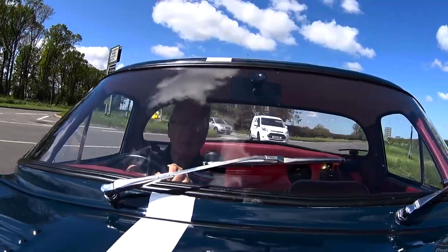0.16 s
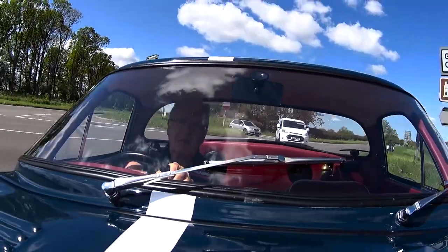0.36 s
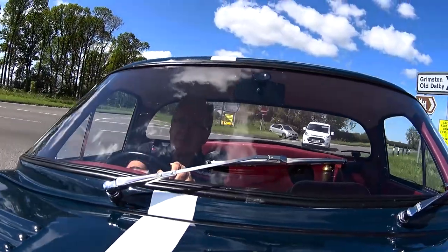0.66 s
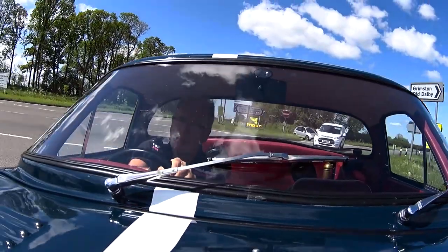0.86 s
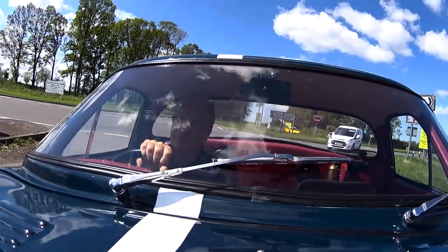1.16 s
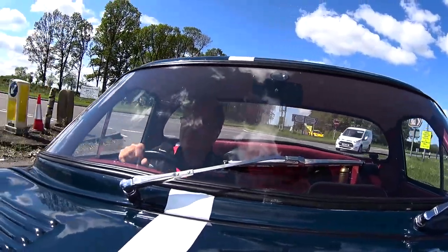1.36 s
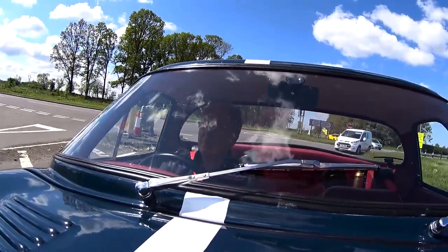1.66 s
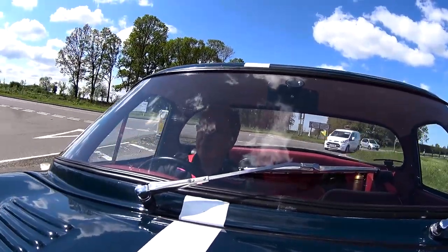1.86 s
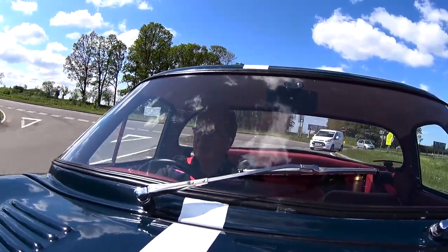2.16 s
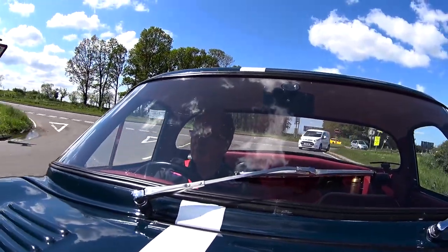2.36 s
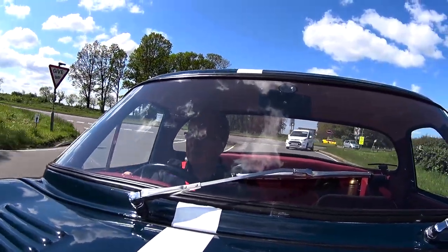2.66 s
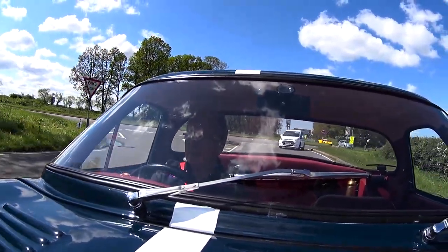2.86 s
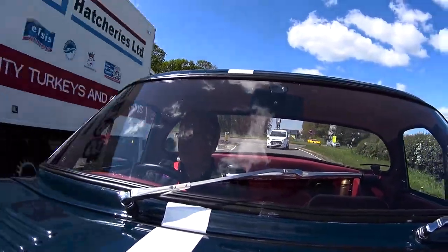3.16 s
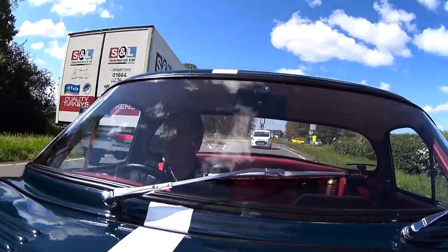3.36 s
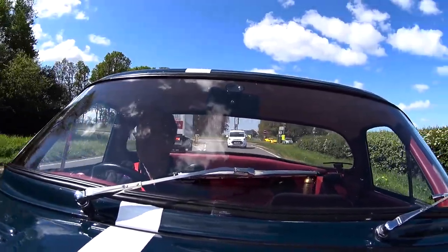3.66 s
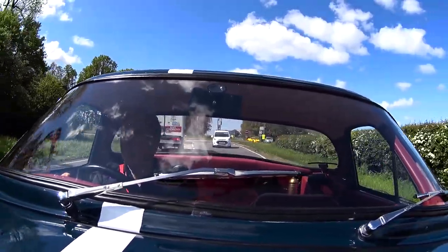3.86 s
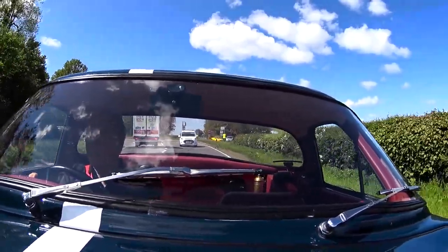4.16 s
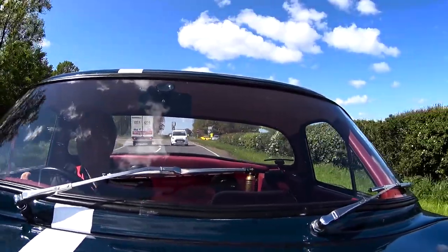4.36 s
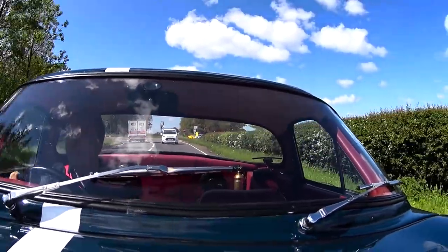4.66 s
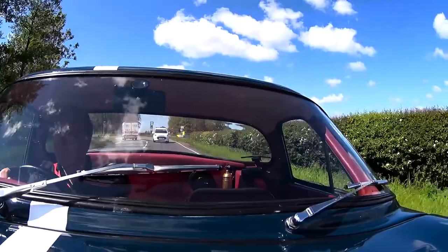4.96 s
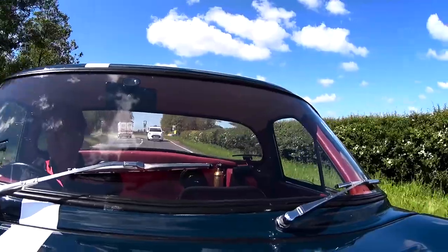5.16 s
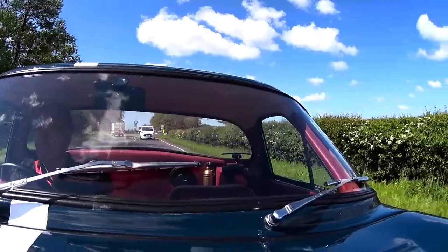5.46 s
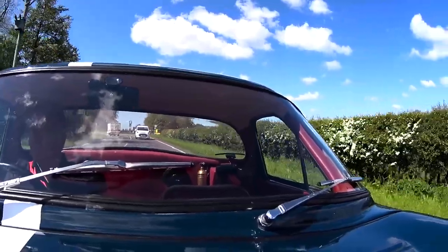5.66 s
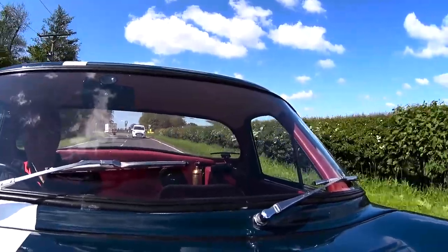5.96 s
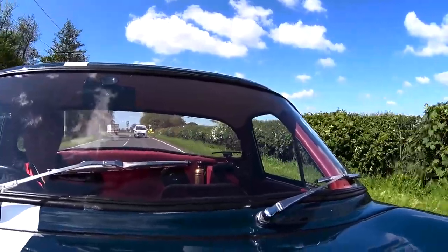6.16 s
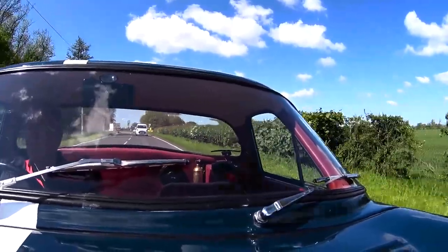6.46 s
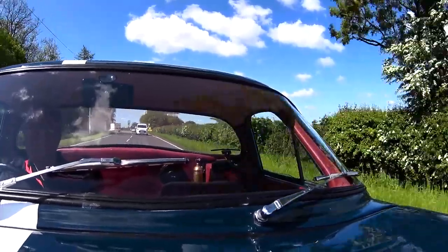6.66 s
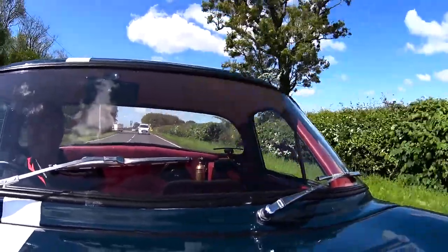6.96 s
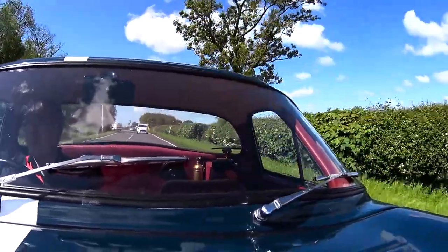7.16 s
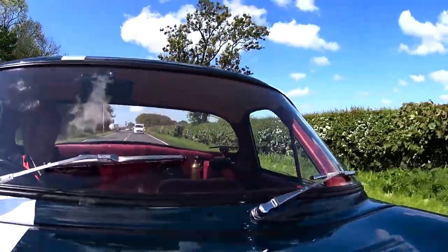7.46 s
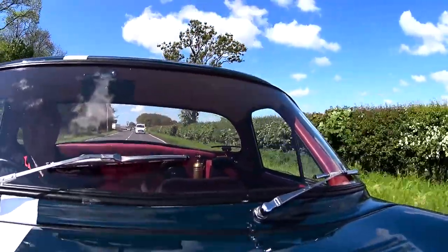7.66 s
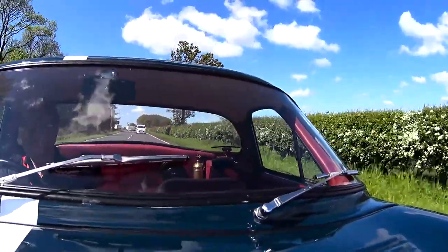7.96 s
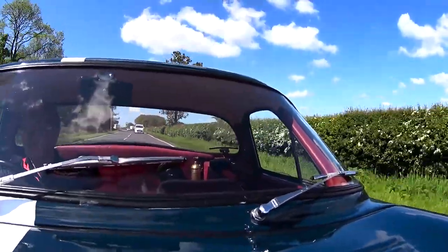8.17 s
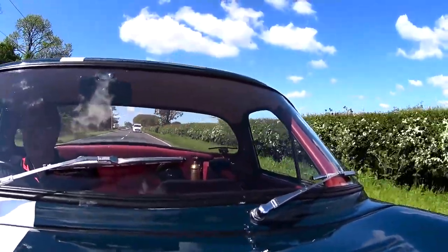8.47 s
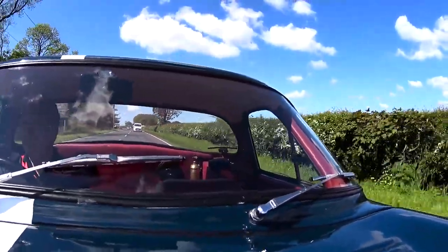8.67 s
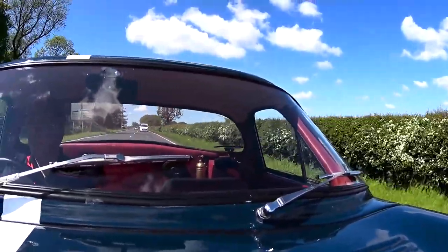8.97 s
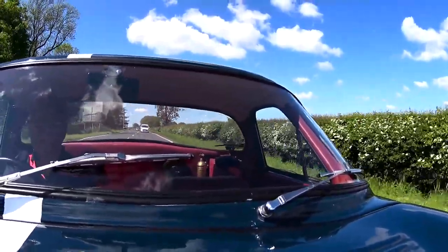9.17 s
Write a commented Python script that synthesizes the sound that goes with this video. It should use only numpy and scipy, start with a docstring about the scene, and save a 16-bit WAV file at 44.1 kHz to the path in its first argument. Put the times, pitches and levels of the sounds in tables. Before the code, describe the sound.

From a microphone on the bonnet of a moving sports car, a V8 engine coasts at low revs, then climbs in one long, booming pull, getting higher and louder. It falls away for a gear change, blips and picks up again at a lower pitch. Low wind buffeting and road rumble build throughout, with faint metallic ticks and jingles from vibrating fittings.

```python
"""V8 sports car from the bonnet

The car coasts, pulls through one gear, shifts at 7-8 s and pulls again. The engine sounds in orders
(multiples) of its two-turn cycle, coloured by pipes and panels. Air buffets the microphone, tyres
and wind grow with speed, loose parts jingle, chatter, tick and ping; a limiter holds the peaks."""
import sys
import numpy as np
from scipy import signal
from scipy.fft import rfft, irfft, next_fast_len
from scipy.io import wavfile
from scipy.ndimage import uniform_filter1d, minimum_filter1d

SR = 44100
rng = np.random.default_rng(int(sys.argv[2]) if len(sys.argv) > 2 else 0)


def wrap_up_sound(samples):
    """Save the sound to the file named by the first command line argument, as 16-bit audio."""
    columns = np.atleast_2d(samples).T
    # keep every value between -1 and 1, then stretch to whole-number steps
    tamed = np.clip(columns, -1, 1)
    steps = np.round(tamed * 32767).astype(np.int16)
    wavfile.write(sys.argv[1], SR, steps)


N = 410571
T = np.arange(N) / SR
CYLINDERS, LOW_FIRING_HZ, TOP_FIRING_HZ = 8, 140, 350
SIDE = np.array([[1], [-1]])  # left plus, right minus
# engine firing rate: t/s, f/Hz
FIRING_RATE = [(0, 146), (.9, 137), (1.4, 141.5), (2, 156.5), (2.9, 182), (3.6, 211), (4.4, 246),
               (5.2, 282.5), (6, 316), (6.85, 352.5), (7.03, 354.5), (7.3, 321), (7.8, 256.5), (7.88, 270),
               (7.93, 308), (8.04, 310), (8.11, 262), (8.16, 256), (8.26, 243), (9.3, 266)]


def undb(db):
    """Decibels to gain."""
    return np.exp(np.log(10) / 20 * np.asarray(db))


def curve(table):
    """A (t/s, value) table, linearly interpolated per sample."""
    return np.interp(T, *np.transpose(table))


def unit(x):
    """Scale to rms 1."""
    return x / np.sqrt(np.mean(x ** 2))


def walk(rate_hz):
    """Random wander with a spread near 1."""
    return 1.2 * np.interp(T * rate_hz, np.arange(8192), rng.standard_normal(8192))


def pan(left_db):
    """Channel gains for a left minus right level."""
    return undb(SIDE * left_db / 2)


def noise(colour, side_db):
    """Stereo noise with an (f/Hz, level/dB) spectrum: mid at rms 1, side at side_db."""
    hz, db = np.transpose(colour)
    size = next_fast_len(N, real=True)
    bins_hz = np.maximum(np.fft.rfftfreq(size, 1 / SR), 1)
    gain = undb(np.interp(np.log(bins_hz), np.log(hz), db, left=-120, right=-120))
    mid, side = irfft(rfft(rng.standard_normal((2, size))) * gain, size)[:, :N]
    return unit(mid) + undb(side_db) * unit(side) * SIDE


def response(hz, resonances):
    """Gain at hz of a set of resonances (f/Hz, width/Hz, level/dB)."""
    grid_hz = np.arange(10, 3000)
    power = sum(undb(db) ** 2 / (1 + ((grid_hz / f - f / grid_hz) * f / width_hz) ** 2)
                for f, width_hz, db in resonances)
    return np.interp(hz, grid_hz, np.sqrt(power))


def speed_db(cruise_db, db_per_doubling, wind_share, cruise_km_h=100):
    """Level that grows with road speed and takes a share of the headwind."""
    # road speed: t/s, v/(km/h)
    speed = [(0, 44.8), (1.3, 42), (2.9, 40.7), (5.2, 74.4), (7, 90.3), (8.2, 98), (9.3, 100)]
    # wind on the bonnet: t/s, level/dB
    headwind = [(0, -7.5), (2.9, 4.5), (3.3, 5.5), (5.3, 3), (6.85, 8), (7.9, -5.5), (8.9, 1.5), (9.3, 1.5)]
    doublings = np.log2(curve(speed) / cruise_km_h)
    return cruise_db + db_per_doubling * doublings + wind_share * curve(headwind)


def boom(angle, cycle_hz, shut, flutter_db=.5, spread_rad=.24, shift_s=7.6, tall_gear_db=-9):
    """Strong low orders swell as the revs carry them through exhaust and cabin resonances."""
    # booming orders: order, left minus right/dB
    orders = [(2, 3.3), (6, 2), (8, -.7), (16, 0)]
    # their strengths: full-throttle level/dB, change when shut/dB
    levels = [(2, -29), (-7, -11.5), (3, -15.5), (-5, -8.5)]
    # exhaust and cabin: f/Hz, width/Hz, level/dB
    resonances = [(40, 10.4, 16.5), (57.8, 4.6, 19), (149, 29.5, 8.5), (206.6, 14.8, 9.5),
                  (253.7, 28.6, 9.5), (340, 110, -1), (475, 14.2, 9), (569, 34, -1.5)]
    # cancellation between the two pipes: f/Hz, width/Hz, depth 0-1
    notches = [(235.2, 9.2, 0.59), (330.3, 30.3, 0.94)]
    out = 0
    for (order, left_db), (db, shut_db) in zip(orders, levels):
        hz = order * cycle_hz
        phase = order * angle + rng.uniform(0, 2 * np.pi) + spread_rad * walk(4.5) * SIDE
        gain = response(hz, resonances) * undb(db + shut_db * shut + flutter_db * walk(22))
        if order == 2:  # once-a-turn shudder, weaker in the taller gear
            gain *= undb(tall_gear_db * np.clip(2 * (T - shift_s) + .5, 0, 1))
        if order == CYLINDERS:  # firing note
            for notch_hz, width_hz, depth in notches:
                gain *= 1 - depth * np.exp(-((hz - notch_hz) / width_hz) ** 2)
        out += np.sqrt(2) * gain * pan(left_db) * np.sin(phase)
    return out


def growl(angle, cycle_hz, flutter_db=2, flutter_db_per_khz=2.5, blur_hz=1150, spread_rad=.79):
    """Unequal cylinders raise many orders, which swell in turn in pipe and panel resonances."""
    # uneven orders: order, low-rev level/dB, top-rev level/dB
    orders = [(3, 0, 7.5), (4, 10, 5.5), (5, 5.5, 2), (7, -4, -4), (9, -0.5, -4), (10, 0.5, 1),
              (11, 2, 1.5), (15, 0, 3.5), (17, 2.5, -1), (18, 7.5, -4), (19, 7.5, -3.5), (20, -0.5, -1),
              (21, 1.5, -2), (22, 4, -2), (23, -8, -0.5), (24, -1, 1.5), (25, -2.5, -2), (26, -3.5, -3),
              (27, -2, -2.5), (28, -2.5, 1.5), (29, -15, 3), (31, -4, 2), (32, -4, 1), (33, -2, 3),
              (35, -8, 4), (36, -2, -5), (38, -6, -4), (39, 1.5, -9), (40, -6, -2), (44, -10.5, -2),
              (48, -2, -5)]
    # pipes and panels: f/Hz, width/Hz, level/dB
    body = [(137, 99, -11.5), (260, 24, -1), (341.6, 23, -7.5), (470, 13.6, -5), (547, 36, -12),
            (686, 34, -15), (835, 30, -23), (920, 35, -13), (1142, 88, -15.5), (1220, 30, -17.5),
            (1610, 64, -19.5), (1803, 36, -21)]
    step = 8  # low notes only: computed at SR / step
    t, angle, cycle_hz = T[::step], angle[::step], cycle_hz[::step]
    revs = np.log(CYLINDERS * cycle_hz / LOW_FIRING_HZ) / np.log(TOP_FIRING_HZ / LOW_FIRING_HZ)
    out = 0
    for order, low_db, top_db in orders:
        flutter, drift, apart = (np.interp(t * rate_hz, np.arange(512), rng.standard_normal(512))
                                 for rate_hz in (22, 16, 6))
        hz = order * cycle_hz
        db = low_db + (top_db - low_db) * revs
        db += (flutter_db + flutter_db_per_khz * hz / 1000) * flutter
        # moving air shifts the phase, short waves most
        shift_rad = (hz / blur_hz) ** 2 * drift + spread_rad * np.minimum(hz / 400, 1) * apart * SIDE
        phase = order * angle + shift_rad + rng.uniform(0, 2 * np.pi)
        out += np.sqrt(2) * response(hz, body) * undb(db) * np.sin(phase)
    return signal.resample_poly(out, step, 1, axis=1, window=("kaiser", 9))[:, :N] * pan(left_db=-1.2)


def rasp(angle):
    """Gas noise pulses with the firings; the uneven banks add a throb once a turn."""
    puffs = unit((1 + .6 * np.cos(CYLINDERS * angle)) * (1 + .2 * np.cos(2 * angle)))
    # gas spectrum: f/Hz, level/dB
    colour = [(400, -29), (700, 4.5), (1200, 4), (1800, -4.5), (2600, -16), (6000, -36)]
    return puffs * noise(colour, side_db=-27)


def howl(angle, cycle_hz, shut, pipe_hz=476, width_hz=38, leak_db=-21, shut_db=-20, flutter_db=1.2):
    """Three clean orders ring out near the main pipe resonance and leak faintly elsewhere."""
    # howling orders: order, level/dB
    orders = [(12, 2), (13, 6.5), (14, 1.5)]
    out = 0
    for order, db in orders:
        ring = response(order * cycle_hz, [(pipe_hz, width_hz, 0)]) ** 2 + undb(leak_db)
        phase = order * angle + rng.uniform(0, 2 * np.pi) + .45 * walk(6) * SIDE
        out += ring * undb(db + shut_db * shut + flutter_db * walk(22)) * np.sin(phase)
    return np.sqrt(2) * out * pan(left_db=-2.5)


def whine(angle, cycle_hz, revs_oct, shut, shut_db=-8, high_db=-55.5, db_per_oct=19):
    """Two thin tones from a slipping belt: the low one rings panels, the high one grows with revs."""
    # belt tones: low order, high order
    orders = (34, 78.7)
    # panels: f/Hz, width/Hz, level/dB
    panels = [(740, 75, -41.5), (865, 130, -36.5)]
    flutter_db, slip_rad = 3, .012
    low = sum(undb(db + shut_db * shut) * response(orders[0] * cycle_hz, [(hz, width_hz, 0)]) ** 2
              for hz, width_hz, db in panels)
    high = undb(high_db + db_per_oct * revs_oct)
    tones = sum(gain * undb(flutter_db * walk(16)) * np.sin(order * (angle + slip_rad * walk(40)))
                for order, gain in zip(orders, (low, high)))
    return np.sqrt(2) * tones


def burble(angle, cycle_hz, revs_oct, throttle, gas_db=-41, db_per_oct=-10, throb_db=2, flutter_db=1.8):
    """Off the throttle the exhaust burbles, most at low revs, and single orders drone in the pipes."""
    # burble spectrum: f/Hz, level/dB
    colour = [(100, 7), (165, -4), (215, 0.5), (245, 6.5), (275, -6.5), (315, -13.5), (365, -5.5),
              (420, -6.5), (520, -29)]
    # pipe drones: order, resonance f/Hz, width/Hz, level/dB
    drones = [(5, 86, 22, -24.5), (5, 184, 8, -26), (6, 203, 17, -18.5), (6, 252, 12, -24),
              (8, 136, 10, -36), (8, 338, 22, -29), (10, 402, 40, -24.5), (13, 228, 20, -37),
              (16, 281, 31, -35), (21, 367, 30, -43)]
    gas = undb(gas_db + db_per_oct * revs_oct + throb_db * walk(18)) * noise(colour, side_db=-10)
    wobble_rad = .22 * 4 ** revs_oct  # more ragged at high revs
    drone = 0
    for order, *pipe in drones:
        gain = response(order * cycle_hz, [pipe]) * undb(flutter_db * walk(13))
        drone += gain * np.sin(order * angle + wobble_rad * walk(30))
    overrun = np.clip(1 - throttle / .74, 0, 1)
    return overrun * (gas + np.sqrt(2) * drone * pan(left_db=4))


def engine(exhaust_db=-18, db_per_oct=11):
    """One slightly uneven crankshaft drives all orders; revs and throttle set their strength."""
    # coast, pull, lift to shift, blip, pull harder: t/s, throttle 0-1
    pedal = [(0, .3), (.25, 0), (1.05, 0), (1.28, .6), (1.85, .5), (1.93, .8), (7.0, .8), (7.2, 0),
             (7.86, 0), (7.93, .3), (8.06, .2), (8.13, .9), (8.8, .85), (9.1, 1)]
    firing_hz, throttle = curve(FIRING_RATE), curve(pedal)
    cycle_hz, shut = firing_hz / CYLINDERS, 1 - throttle
    revs_oct = np.log2(firing_hz / TOP_FIRING_HZ)
    angle = 2 * np.pi * np.cumsum(cycle_hz) / SR + .006 * walk(45)  # 2 pi per two turns
    exhaust = undb(-14 - 11 * shut) * rasp(angle)
    exhaust += undb(.5 - 14 * shut) * growl(angle, cycle_hz)
    exhaust += boom(angle, cycle_hz, shut) + howl(angle, cycle_hz, shut)
    exhaust *= undb(exhaust_db + db_per_oct * revs_oct)
    belt = whine(angle, cycle_hz, revs_oct, shut)
    return exhaust + belt + burble(angle, cycle_hz, revs_oct, throttle)


def road(bumps_db=.5, grain_db=.27):
    """The body rumbles and the tyres roar on an uneven surface, louder with speed."""
    # body rumble spectrum: f/Hz, level/dB
    rumble_colour = [(70, -33), (125, -12), (170, 2), (215, -7.5), (275, 3.5), (315, 1), (365, -1.5),
                     (450, -5), (560, -16), (1500, -49)]
    # tyre roar spectrum: f/Hz, level/dB
    tyre_colour = [(250, -21), (470, 2), (580, -0.5), (800, -0.5), (1030, -4.5), (1230, -5.5), (1430, -12),
                   (1700, -10.5), (2200, -23), (3200, -30), (8000, -76)]
    rumble_db = speed_db(cruise_db=-21.5, db_per_doubling=13.5, wind_share=.32)
    roar_db = speed_db(cruise_db=-25.5, db_per_doubling=13.5, wind_share=.37)
    rumble = undb(rumble_db + bumps_db * walk(15)) * noise(rumble_colour, side_db=-5.5)
    roar = undb(roar_db + grain_db * walk(30)) * noise(tyre_colour, side_db=-3)
    return (rumble + roar) * pan(left_db=-.9)


def wind(swirl_db=2, flicker_db=.5, overload=.74):
    """Large eddies thump and overload the microphone, small ones flutter, the airstream hisses."""
    # large-eddy spectrum: f/Hz, level/dB
    buffet_colour = [(8, -30), (14, -5.5), (24, 5), (35, 3.5), (58, -5), (85, -9.5), (120, -16), (180, -35),
                     (400, -65)]
    # small-eddy spectrum: f/Hz, level/dB
    eddy_colour = [(55, -39), (88, -5.5), (130, -13.5), (175, -19.5), (300, -32)]
    # airstream spectrum: f/Hz, level/dB
    air_colour = [(1000, -15), (2200, 5), (3200, 1), (5000, -0.5), (6300, -2.5), (7500, -4), (10700, -5.5),
                  (12500, -9.5), (15700, -14.5)]
    # single gusts: t/s, length/s, boost/dB
    gusts = [(.66, 0.39, 6), (1.273, 0.11, 8.5), (3.215, 0.16, 11), (4.4, 0.078, 8), (4.895, 0.033, 17),
             (5.566, 0.098, 5), (6.746, 0.14, 10.5), (7.502, 0.089, 11.5)]
    buffet_db = speed_db(cruise_db=-6, db_per_doubling=15.5, wind_share=.056)
    eddy_db = speed_db(cruise_db=-17.5, db_per_doubling=16.5, wind_share=.05)
    hiss_db = speed_db(cruise_db=-43, db_per_doubling=13.5, wind_share=.79)
    gust_db = sum(db * np.exp(-(2 * (T - at_s) / length_s) ** 2) for at_s, length_s, db in gusts)
    swirl = noise(buffet_colour, side_db=-9)
    swirl /= np.sqrt(uniform_filter1d(np.mean(swirl ** 2, axis=0), 4000))  # even out the strength
    thumps = undb(buffet_db + gust_db + swirl_db * walk(10)) * swirl * pan(left_db=.5)
    flutter = undb(eddy_db) * noise(eddy_colour, side_db=3)
    hiss = undb(hiss_db + flicker_db * walk(40)) * noise(air_colour, side_db=-2) * pan(left_db=-.6)
    return overload * np.tanh(thumps / overload) + flutter + hiss


def jingle(shimmer_db=2):
    """Engine shake keeps thin metal parts ringing, louder with revs."""
    # ringing bands: f/Hz, width/Hz, top-rev level/dB, slope/(dB per octave of revs)
    bands = [(690, 30, -40, 7), (3480, 300, -67, 6), (5800, 700, -69, 7), (10040, 160, -68, 10),
             (10790, 160, -66, 16), (10960, 400, -68, 11), (12950, 400, -71, 11)]
    firing_hz = curve(FIRING_RATE)
    revs_oct = np.log2(firing_hz / firing_hz.max())
    out = 0
    for hz, width_hz, db, db_per_oct in bands:
        phase = 2 * np.pi * hz * T
        gain = undb(db + db_per_oct * revs_oct + shimmer_db * walk(16))
        out += gain * (walk(width_hz) * np.sin(phase) + walk(width_hz) * np.cos(phase))
    return out


def knocks(blows, modes, crack_db, crack_s, gain_db, size=12000):
    """Each blow is a dry crack that rings a small part's modes; it peaks at its level plus gain_db."""
    t, out = np.arange(size) / SR, np.zeros((2, N + size))
    band = signal.butter(2, [.85 * modes[0][0], 1.05 * modes[-1][0]], "band", fs=SR, output="sos")
    for at_s, level_db in blows:
        burst = rng.standard_normal((2, size)) * np.exp(-t / crack_s)
        hit = undb(crack_db) * signal.sosfilt(band, burst)
        for hz, db, t60_s in modes:
            phase = rng.uniform(0, 2 * np.pi) + 2 * rng.standard_normal((2, 1))
            hit += undb(db - 60 * t / t60_s) * np.sin(2 * np.pi * hz * t + phase)
        start = int(at_s * SR)
        out[:, start:start + size] += undb(level_db + gain_db) * hit / np.abs(hit).max()
    return out[:, :N]


def chatter(period_s=.0648, scatter_db=2):
    """A loose fitting rattles in bursts of evenly spaced blows that swell or fade."""
    # bursts: t/s, blow count, first level/dB, last level/dB
    bursts = [(.026, 9, -57, -49), (2.5586, 3, -44, -49), (3.31, 4, -54, -45), (8.19, 4, -45, -41),
              (8.893, 2, -39, -40)]
    # fitting modes: f/Hz, level/dB, t60/s
    modes = [(3430, -5, .04), (3800, -2, .05), (4200, -5, .03), (4570, -2, .05), (4740, -3, .04),
             (4900, 0, .06)]
    blows = [(start_s + k * period_s, db - scatter_db * rng.standard_normal())
             for start_s, count, first_db, last_db in bursts
             for k, db in enumerate(np.linspace(first_db, last_db, count))]
    return knocks(blows, modes, crack_db=6, crack_s=.01, gain_db=8)


def squeak(start_s=.24, length_s=.19, hz=1685, db=-53, waver_hz=12):
    """Something rubs with a brief, wavering squeal."""
    swell = np.sqrt(np.maximum(0, 1 - (2 * (T - start_s) / length_s - 1) ** 2))
    phase = 2 * np.pi * np.cumsum(hz + waver_hz * walk(48.6)) / SR
    return np.sqrt(2) * undb(db) * swell * np.sin(phase)


def ticks():
    """Light, sharp blows on a loose part die away fast."""
    # ticks: t/s, level/dB
    blows = [(0.6559, -54), (1.3218, -51), (1.9637, -50), (2.4195, -47), (3.45, -52), (7.9991, -46),
             (8.756, -41), (8.8133, -40)]
    # part modes: f/Hz, level/dB, t60/s
    modes = [(9606, -9, .012), (11800, 5, .03), (12900, -7, .02), (14400, -5, .02)]
    return knocks(blows, modes, crack_db=4, crack_s=.006, gain_db=7)


def pings():
    """A small metal part is knocked and rings on."""
    # pings: t/s, level/dB
    blows = [(2.4753, -43), (2.6509, -60), (2.7861, -47), (3.0415, -48), (3.7194, -44), (4.2497, -53),
             (4.4882, -52), (5.1093, -46), (6.3824, -44), (8.1144, -43), (8.1698, -41), (8.4163, -40),
             (9.2125, -54)]
    # metal modes: f/Hz, level/dB, t60/s
    modes = [(10000, -12, .15), (10772, -2, 0.32), (10797, -7, .22), (12800, -13, .06)]
    return knocks(blows, modes, crack_db=-5, crack_s=.004, gain_db=2)


def scene():
    """Engine, road, wind and the loose parts they shake."""
    loose_parts = chatter() + ticks() + pings()
    return engine() + road() + wind() + jingle() + loose_parts + squeak()


def record(dry):
    """Fast look-ahead limiter, then a steep low-pass."""
    ceiling, window_samples, cutoff_hz = .745, 260, 15750
    wanted_gain = np.minimum(1, ceiling / (np.abs(dry).max(axis=0) + 1e-9))
    gain = uniform_filter1d(minimum_filter1d(wanted_gain, window_samples), window_samples)
    lowpass = signal.ellip(10, .1, 80, cutoff_hz, fs=SR, output="sos")
    return signal.sosfilt(lowpass, dry * gain)


dry = scene()
out = record(dry)
wrap_up_sound(out)
```